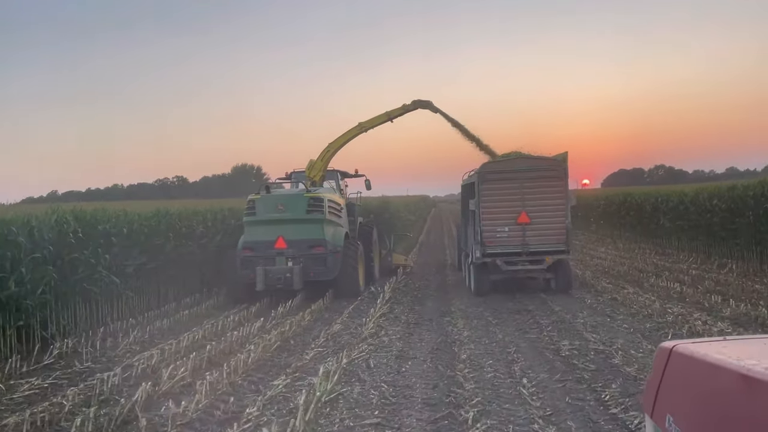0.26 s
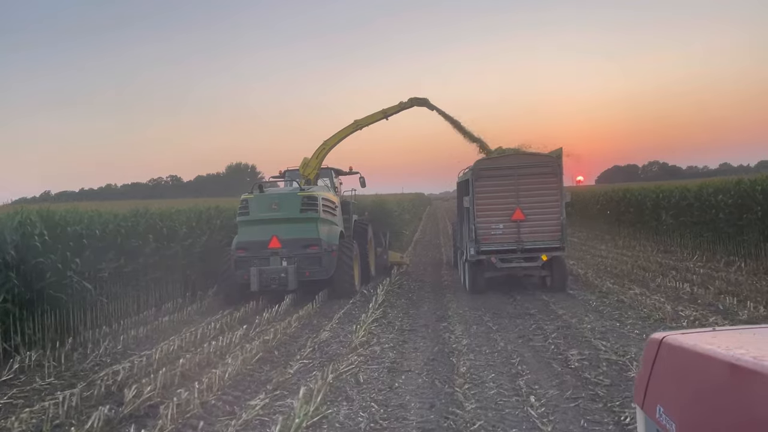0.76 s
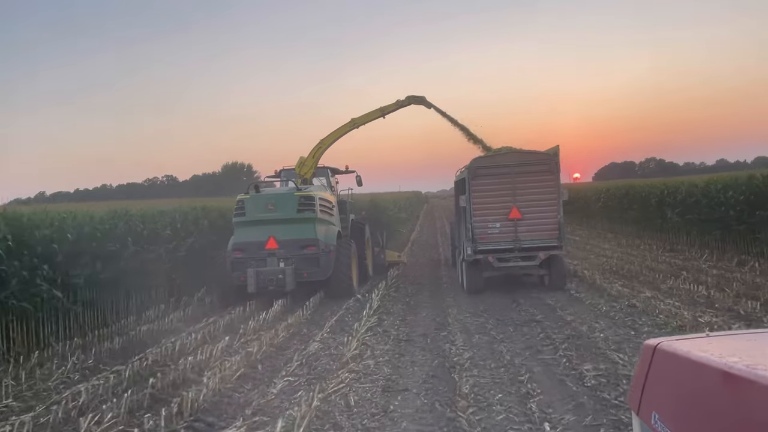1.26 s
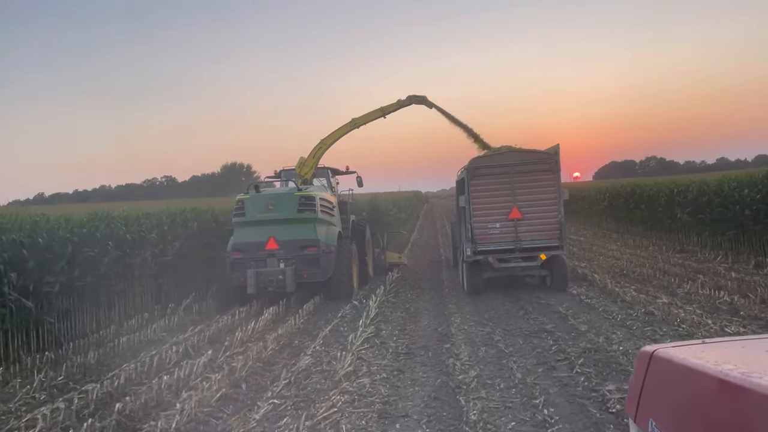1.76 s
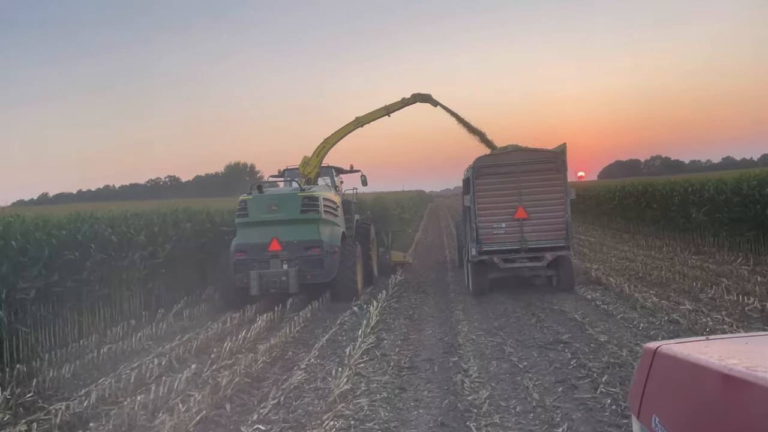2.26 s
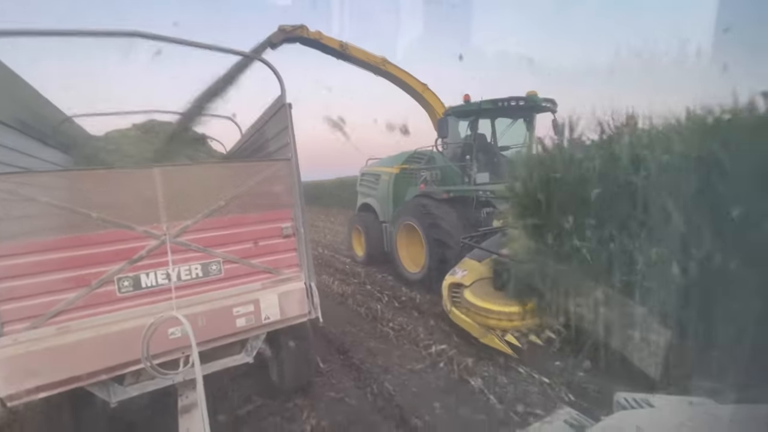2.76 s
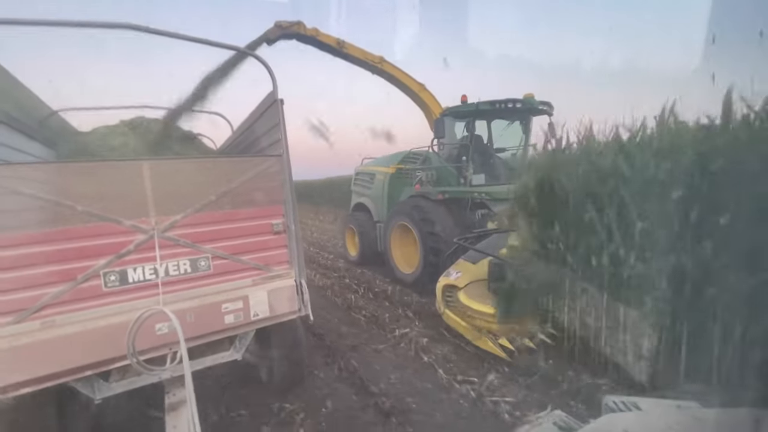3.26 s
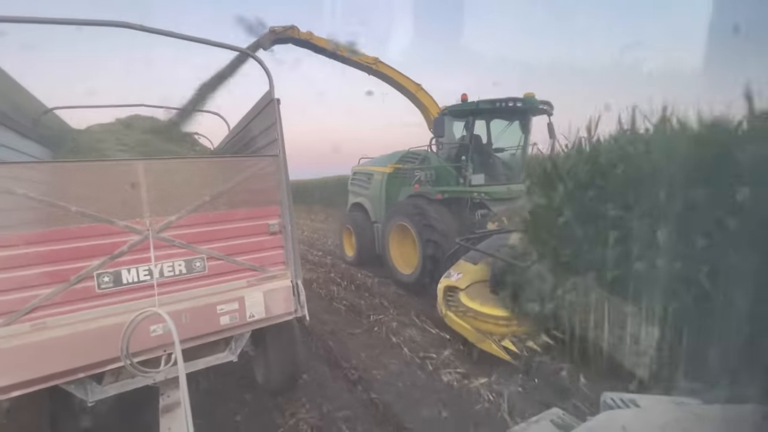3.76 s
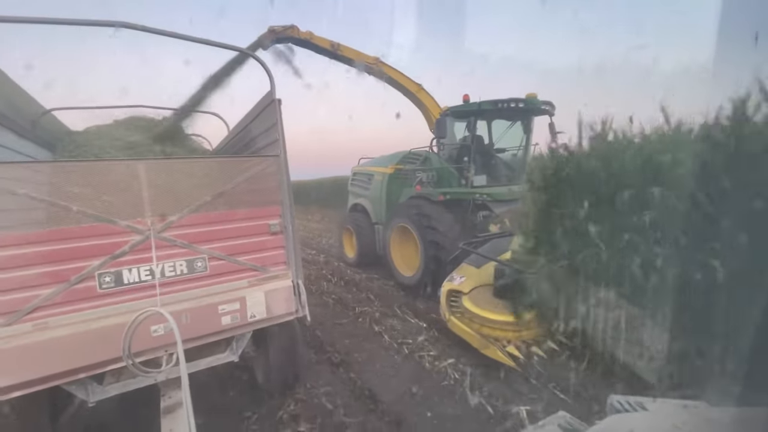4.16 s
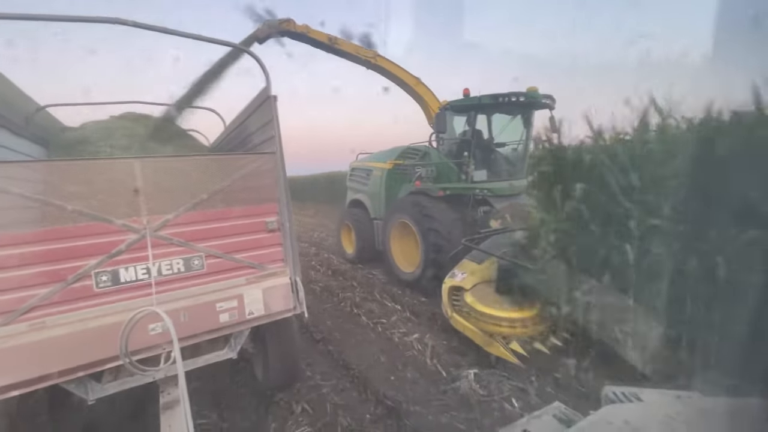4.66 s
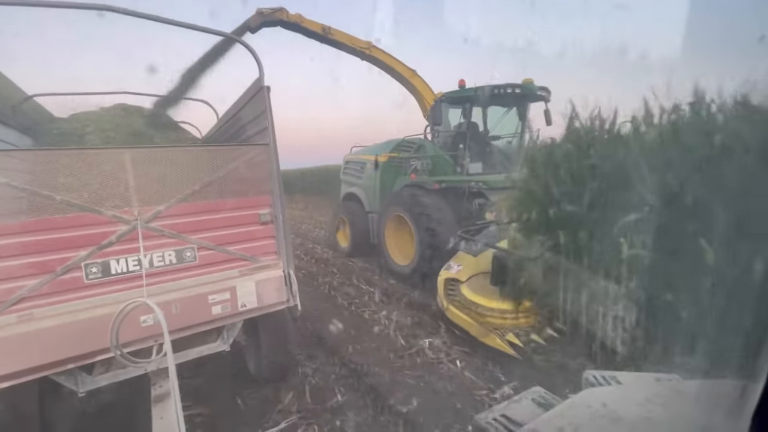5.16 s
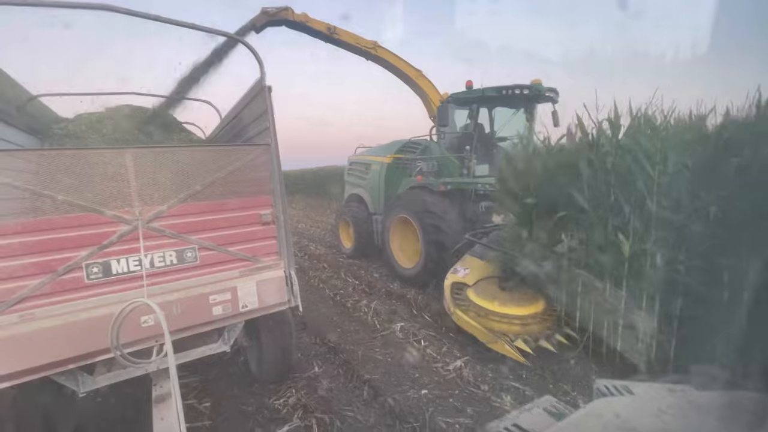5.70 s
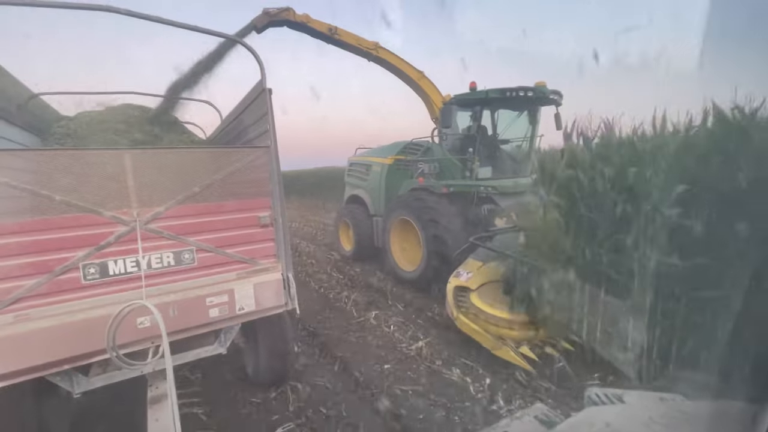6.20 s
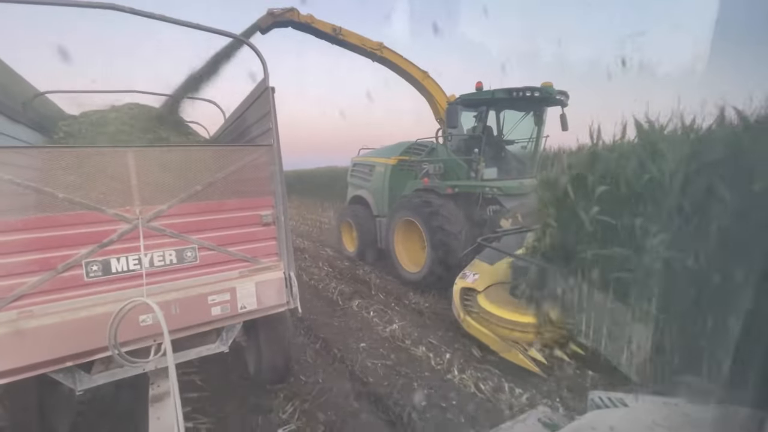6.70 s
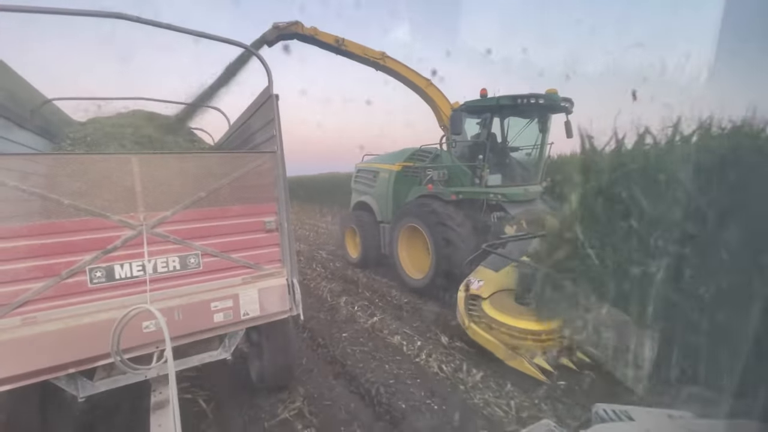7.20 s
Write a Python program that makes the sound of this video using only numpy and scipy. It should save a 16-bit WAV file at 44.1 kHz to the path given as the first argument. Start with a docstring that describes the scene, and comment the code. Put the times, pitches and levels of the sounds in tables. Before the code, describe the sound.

In an open field a forage harvester's six-cylinder diesel drones loudly and steadily, with knocking, broad machine roar, crop hiss, thin whistles and brief faint squeals. An abrupt cut moves the microphone inside a tractor cab: lower engine boom and rumble, wavering gear hum, a singing cutter drum, and chopped maize spraying in uneven surges through a ringing spout. Midway through the cab part, a fitting gives a tiny triple squeak.

```python
"""A forage harvester chops maize and blows it into a trailer pulled by a tractor.
First the open field: a six-cylinder diesel drones in engine orders over a repeating knock pattern,
with shaped-noise roar and hiss, thin sine whistles and a few arching squeals.
At 2.4 s we are in the tractor's cab: engine orders boom over rumble, gears hum, the cutter drum sings,
shaped noise surges as crop and rings the spout; near 4.5 s a fitting squeaks in three quick slips."""
import sys
import numpy as np
from scipy import signal
from scipy.fft import rfft, irfft, next_fast_len
from scipy.io import wavfile

SR = 44100
rng = np.random.default_rng(int(sys.argv[2]) if len(sys.argv) > 2 else 0)


def put_to_file(sound):
    """Save the sound as 16-bit audio at rate SR, in the file named by the first command-line argument."""
    columns = np.atleast_2d(sound).T  # one column per channel
    safe = np.clip(columns, -1, 1)
    whole_steps = np.round(safe * 32767)
    wavfile.write(sys.argv[1], SR, whole_steps.astype(np.int16))


N = 328104

# "Before trim" levels are starting levels; gains in the functions raise or lower them.
# Harvester speed, wandering slightly up and down: start_s, speed_rpm
HARVESTER_SPEED = [(0.0, 1948), (0.37, 1939), (0.61, 1949), (0.92, 1938), (1.22, 1948), (1.71, 1944),
                   (1.96, 1949), (2.37, 1938)]
# Strong orders of the harvester's diesel: cycle_multiple, level_db (rms, before trim), left_right_db,
# left_right_phase_rad
HARVESTER_ORDERS = [(6, -9.9, 0.9, 0.2), (7, -35.2, -0.6, 0.2), (8, -35.2, 1.1, 0.1), (9, -33.0, -0.9, 0.2),
                    (10, -31.4, 0.3, 0.1), (12, -26.3, 2.4, 0.4), (13, -38.7, 0.8, 0.1),
                    (16, -36.2, 1.8, 0.2), (22, -33, -0.6, 0.6), (24, -39.9, -6.2, 1.5),
                    (27, -35.2, -1.3, 0.2), (28, -33.4, 0.2, 0.5), (29, -39.0, -1.7, 0.7),
                    (30, -35.5, -5.0, 0.6), (31, -38.5, -2.9, 0.5), (35, -38.1, 0.6, 0.3),
                    (42, -38.2, -4.6, 0.5), (44, -33.8, -3.1, 0.4), (51, -34.0, -9.9, 1.0),
                    (57, -39.8, -5.0, 1.5), (58, -36.1, 4.7, 0.6), (60, -38.7, -3.9, 0.6),
                    (61, -41.3, -6.0, 0.8), (63, -32.9, -2.7, 0.8), (66, -41.9, -3.7, 1.1),
                    (68, -40.8, -7.6, 1.4), (75, -33.7, -4.5, 0.7), (76, -38.8, 1.9, 0.6),
                    (77, -41, -2, 0.6), (81, -41.6, -3.1, 0.7), (98, -38.9, -2.7, 0.6), (104, -43, -2, 0.6)]
# Knock pattern of the cylinders: pitch_hz, level_db (rms of each line, before trim)
KNOCK_SPECTRUM = [(50, -46), (65, -38), (115, -39), (220, -43), (420, -39.5), (620, -43), (950, -42),
                  (1400, -48), (2200, -53), (3500, -62)]
# Roar of the machines in the open: pitch_hz, mid_db, side_db (per Hz, before trim)
ROAR_SPECTRUM = [(20, -94, -82), (40, -56, -79), (76.6, -45, -68), (151, -51, -82), (206, -65.5, -85),
                 (242, -45, -75), (288, -56, -71), (355, -51, -62), (674, -58, -59.5), (980, -54.5, -66),
                 (1150, -59, -57), (1580, -57, -67)]
# Hiss of the blown crop in the open: pitch_hz, mid_db, side_db (per Hz)
HISS_SPECTRUM = [(1640, -63.5, -62.5), (2100, -63, -67), (3060, -67.5, -67.5), (3800, -68, -72),
                 (4580, -68, -74), (5660, -77.5, -72), (6420, -73.5, -81), (7390, -78, -74),
                 (8620, -133, -74.5), (9640, -83, -76), (11600, -78.5, -79), (13400, -81.5, -125),
                 (15200, -96, -108)]
# Turbo and hydraulic whistles: pitch_hz (at the start), rise_hz_per_s, level_db (rms at the start),
# swell_db_per_s, left_right_phase_rad
WHISTLE_TONES = [(2718, 6, -45.3, 2.8, 1.6), (7700, 30, -49.5, 0, 3.0)]
# Squeals of something rubbing: start_s, length_s, top_hz, top_db (rms)
SQUEAL_EVENTS = [(.22, .11, 2143, -33.3), (.36, .27, 2164, -33.3), (.65, .11, 2164, -36.5),
                 (1.88, .54, 2262, -36.8)]
SQUEAL_ARCH_HZ = 16

# The field drops away as the cab comes in
CUT_S, FIELD_FADE_S, CAB_FADE_S = 2.4, 0.0049, 0.028

# Engine speed heard from the cab, hunting slowly about the governor's setting
TRACTOR_RPM, HUNT_RPM, HUNT_PERIOD_S, HUNT_TOP_S = 1602.7, 2.86, .94, 3.11
# Tractor engine: cycle_multiple, level_db (rms, before trim), left_right_db, left_right_phase_rad
ENGINE_ORDERS = [(3, -32.0, 0.6, 0.1), (6, -19.4, 1.1, 0.1), (7, -35.2, -2.3, 0.3), (8, -39.6, -4.9, 0.5),
                 (9, -27.8, -3.6, 0.5), (10, -40.5, -1.8, 0.6), (12, -18.0, -5.0, 0.5),
                 (13, -39.5, -2.2, 0.7), (14, -34, -1.1, 0.1), (18, -38, -0.2, 0.2), (26, -51.2, -0.1, 0.2),
                 (27, -48.8, -3.0, 0.8), (28, -51, 0, 0.8), (30, -50.4, 3.3, 0.6), (32, -49.7, 4.8, 0.5),
                 (33, -50, 4.0, 1.4), (57, -50, 0, 1.2), (68, -44.5, 0, 1.7), (70, -48, 0, 1.5),
                 (71, -49, 0, 1.5), (75, -48, 0, 1.5)]
# Gears: hum_multiple, level_db (rms, before trim), left_right_db, left_right_phase_rad
GEAR_TONES = [(.505, -36.5, -2, 0.4), (.817, -36.2, 0, 0.2), (1, -29.2, 1, 1.2), (1.5, -45, 2, 1.0),
              (2, -41.5, 3, 1.3), (3, -49, 2, 1.3), (3.93, -53, 0, 1.3)]
# Wandering of the gear hum: start_s, pitch_hz, gain_db
GEAR_WANDER = [(2.43, 289.8, 0), (2.78, 297, 2), (4.45, 293, 4), (4.58, 289.5, 3), (5.78, 299.5, -1),
               (5.93, 296.1, 2), (6.77, 296.6, 1), (7.12, 301.3, 0), (7.44, 300.3, -6.5)]
# Low rumble of the cab: pitch_hz, mid_db, side_db (per Hz, before trim)
RUMBLE_SPECTRUM = [(18, -68, -78), (35, -51, -69), (62, -52, -71), (85, -49.5, -71), (100, -44, -67),
                   (142, -48.5, -75), (214, -55.5, -69), (240, -50.5, -63), (304, -49.5, -55),
                   (346, -61, -66), (417, -61, -70), (455, -56, -62), (473, -64, -62), (523, -64.5, -61),
                   (544, -58, -60.5), (615, -64, -60), (890, -65, -62), (976, -62, -57),
                   (1040, -68.5, -65.5)]
# Cutter drum: knife_rate_multiple, level_db (rms, before trim), left_right_db, left_right_phase_rad
KNIFE_ORDERS = [(2, -38.8, 5.9, 1.5), (3, -31.5, 10.0, 1.9), (4, -46.8, 4.9, 1.9), (5, -53, -0.6, 1.4),
                (6, -54.5, 4.8, 0.7), (8, -59.4, 4.5, 0.7)]
KNIVES_PER_CYCLE = 21.137   # knife passes per four-stroke cycle
# Load on the drum, easing now and then: start_s, note_db (before trim)
CUTTER_LOAD = [(2.4, 0.5), (3.1, 3.5), (3.25, -3), (3.65, 4), (4.03, -2), (4.4, 3), (4.9, 0), (5.35, 0),
               (5.8, 1.5), (6.8, 3.5), (7.3, 2.5), (7.44, -5)]

# Crop noise through the cab's glass: pitch_hz, mid_db, side_db (per Hz, before levelling)
CROP_SPECTRUM = [(1270, -72, -71), (1344, -63, -60.5), (1740, -67.5, -62.5), (2165, -68, -71.5),
                 (2780, -79, -80), (3000, -76, -73), (3300, -80.5, -79), (4550, -69, -68.5),
                 (5520, -85.5, -74), (6260, -70.5, -75), (7050, -83.5, -88), (10300, -102, -89.5),
                 (10770, -90, -83.5), (13600, -80, -103), (15500, -112, -118)]
# Crop flow, thinning now and then: start_s, chopping_db, spray_db (before trim)
CROP_FLOW = [(2.4, -37, -41), (2.62, -42, -49.5), (2.82, -41, -51), (3.2, -39.5, -43), (3.6, -40.5, -47.5),
             (4.1, -39.5, -45.5), (4.65, -36.5, -42.4), (4.84, -39, -49.5), (5.2, -37.5, -44.5),
             (5.8, -36, -44), (6.45, -35.5, -42), (6.66, -38.5, -46.5), (6.9, -37, -42.5), (7.44, -36, -44)]
# Stalks rustling into the header: start_s, above_spray_db (before trim)
RUSTLE_LEVEL = [(2.4, 4.5), (3.2, 3), (4.3, 1), (5.6, -1.5), (7.44, -4)]
# Wads of crop thrown from the spout: start_s, length_s, swell_db
CROP_WADS = [(2.448, 0.09, 2.7), (2.646, 0.13, 6.5), (2.795, 0.1, 6.7), (2.867, 0.1, 5.0),
             (2.964, 0.11, 3.4), (3.281, 0.19, 3.3), (3.452, 0.08, 3.9), (3.55, 0.2, 4.3),
             (3.751, 0.08, 3.8), (3.889, 0.14, 2.6), (4.006, 0.15, 4.1), (4.414, 0.21, 2.4),
             (4.671, 0.19, 4.9), (4.854, 0.12, 7.2), (4.954, 0.13, 7.0), (5.071, 0.12, 3.9),
             (5.238, 0.2, 5.3), (5.437, 0.12, 3.5), (5.577, 0.06, 2.8), (5.662, 0.07, 3.7),
             (5.705, 0.17, 4.1), (5.841, 0.07, 4.6), (5.979, 0.18, 3.0), (6.122, 0.1, 3.2),
             (6.203, 0.18, 2.3), (6.414, 0.2, 3.0), (6.672, 0.1, 4.3), (6.796, 0.09, 3.9),
             (7.068, 0.23, 2.8), (7.276, 0.12, 3.8)]
# Resonances of the spout: pitch_hz, t60_s (first of two rings), level_db (before trim),
# chopping_share (of its swing and the flares), rustle_share (of its swing)
SPOUT_RESONANCES = [(1535, 0.049, -2.1, 1.0, .05), (2935, 0.1, -14, 0.05, .9), (3114, 0.037, -14, 0.05, 1),
                    (3226, 0.065, -16, 0.05, .9)]
# Moments when the spout's lowest strand sings out: start_s, length_s, swell_db (before each strand's share)
SPOUT_FLARES = [(3.08, .16, 4), (3.36, .11, 5), (4.54, .16, 2), (4.99, .12, 3), (5.44, .13, 4),
                (6.11, .1, 5), (6.21, .09, 4.5), (6.42, .12, 3), (6.72, .14, 2), (7.05, .14, 4.5),
                (7.21, .12, 5)]

# Three quick slips of a cab fitting: start_s, length_s, tone_db (rms at the top)
SQUEAK_SLIPS = [(4.483, .0055, -21), (4.4888, .005, -21.5), (4.4945, .012, -25)]
SQUEAK_HZ, SQUEAK_RISE_HZ_PER_S, OVERTONE_T60_S = 1830, 300, .05
# Ringing overtones above the squeak's tone: pitch_hz, level_db (relative to its tone)
SQUEAK_OVERTONES = [(3784, -12.5), (5830, -15), (6713, -19)]
# Its dry scrape: pitch_hz, mid_db, side_db (per Hz, relative)
SCRAPE_SPECTRUM = [(2500, -10, -13), (4500, -7, -9), (5400, 0, -4), (6800, -6, -7), (8000, -14, -12),
                   (13500, -11, -19)]
SCRAPE_DB, SCRAPE_FADE_DB_PER_S = -11.5, 150   # relative to its tone

CUTOFF_HZ, EDGE_FADE_S = 15700, .004


def from_db(db):
    """Decibels to gain."""
    return 10 ** (np.asarray(db) / 20)


def since(start_s):
    """Seconds since this moment, at every sample."""
    return np.arange(N) / SR - start_s


def ramp(start_s, length_s):
    """Rises from 0 to 1 over this stretch."""
    return np.clip(since(start_s) / length_s, 0, 1)


def swells(rows):
    """Decibels added by smooth humps, one for each row."""
    return sum(swell_db * np.sin(np.pi * ramp(start_s, length_s)) ** 2 for start_s, length_s, swell_db in rows)


def in_time(rows):
    """Each column of a curve at every sample."""
    knots_s, *columns = np.transpose(rows)
    return [np.interp(np.arange(N) / SR, knots_s, column) for column in columns]


def at_hz(points, hz):
    """Each column of a spectrum at these frequencies, joined along a log frequency axis."""
    knots_hz, *columns = np.transpose(points)
    return [np.interp(np.log(hz + 1e-9), np.log(knots_hz), column) for column in columns]


def drift(rate_hz):
    """Slow random wander of spread 1: low-passed noise drawn at every 40th sample."""
    pole = np.exp(-80 * np.pi * rate_hz / SR)
    noise = rng.standard_normal(N // 40 + 2002)
    slow = signal.lfilter([1], [1, -2 * pole, pole * pole], noise)[2000:]   # drop the filter's settling
    return np.interp(np.arange(N) / 40, np.arange(len(slow)), slow / slow.std())


def turns(per_s):
    """Angle in radians of something turning at this rate."""
    return 2 * np.pi * np.cumsum(per_s) / SR


def cycle_rate(rpm):
    """Four-stroke cycles per second: one for every two turns of the crank."""
    return rpm / 120


def white():
    """Unrelated noise for mid and side."""
    return rng.standard_normal((2, N))


def coloured(excitation, spectrum, low_hz, high_hz):
    """Gives mid and side excitation a spectrum between two steep edges; returns left and right."""
    size = next_fast_len(N)
    hz = np.arange(size // 2 + 1) * SR / size + 1e-3
    edges = 1 / np.sqrt((1 + (low_hz / hz) ** 16) * (1 + (hz / high_hz) ** 16))
    shaped = rfft(excitation, size) * from_db(at_hz(spectrum, hz)) * edges
    mid, side = irfft(shaped, size)[:, :N] * np.sqrt(SR / 2)   # levels are per Hz
    return np.array([mid + side, mid - side])


def rms_one(stereo):
    """Scales a stereo sound so that its middle has rms 1."""
    return stereo / stereo.mean(axis=0).std()


def tone(angle, spread_rad, locked=False):
    """A stereo sine of rms 1, left leading by a phase; unless locked it starts anywhere."""
    start = rng.uniform(0, 2 * np.pi) * (not locked)
    angle = (angle % (2 * np.pi) + start).astype(np.float32)
    half = np.float32(spread_rad / 2)
    return np.sqrt(2) * np.array([np.sin(angle + half), np.sin(angle - half)])


def orders(angle, table, waver_db, waver_hz, count=6):
    """Tones locked to a shaft, the weaker wavering more; multiples of count rise together as one pulse."""
    out = np.zeros((2, N))
    strongest_db = max(row[1] for row in table)
    for multiple, level_db, pan_db, spread_rad in table:
        unsteady = np.clip((strongest_db - level_db) / 20, .2, 1)
        gain = from_db(level_db + waver_db * unsteady * drift(waver_hz))
        sides = from_db([[pan_db / 2], [-pan_db / 2]])
        balance = sides / np.sqrt(np.mean(sides ** 2))
        out += gain * balance * tone(multiple * angle, spread_rad, locked=multiple % count == 0)
    return out


def ring(excitation, hz, t60_s):
    """A mode: a unit click sets a sine of about height 1 ringing, down 60 dB after t60."""
    pole = from_db(-60 / (t60_s * SR))
    step = 2 * np.pi * hz / SR
    feedback = [1, -2 * pole * np.cos(step), pole * pole]
    return signal.lfilter([0, np.sin(step)], feedback, excitation + 1e-18)


def field_diesel(cycle, drone_db=0.17, knock_db=-2.0, rattle_db=-8, rattle_hz=7):
    """Exhaust drone at the firing rate, with block clatter and a looser rattle that comes and goes."""
    clatter = from_db(knock_db) * knock(cycle)
    rattle = from_db(rattle_db) * drift(rattle_hz) * knock(cycle)
    return from_db(drone_db) * orders(cycle, HARVESTER_ORDERS, waver_db=2.5, waver_hz=11.4) + clatter + rattle


def knock(cycle, size=8192, count=215):
    """Cylinders knock unalike, so one uneven pattern repeats each cycle and fills in the weak orders."""
    multiple = np.arange(3, count)
    hz = multiple * cycle_rate(np.mean(np.array(HARVESTER_SPEED)[:, 1]))
    weak = ~np.isin(multiple, np.array(HARVESTER_ORDERS)[:, 0])
    any_phase = np.exp(2j * np.pi * rng.random(len(hz)))
    lines = weak * from_db(at_hz(KNOCK_SPECTRUM, hz)[0]) * any_phase
    # the sides differ more towards the treble
    spread_rad = np.minimum(hz / 1500, 1) * rng.normal(0, 1.0, (2, len(hz)))
    spectrum = np.pad(lines * np.exp(1j * spread_rad), ((0, 0), (3, 0)))
    pattern = irfft(spectrum, size) * size / np.sqrt(2)
    place = cycle / (2 * np.pi) * size
    return np.array([np.interp(place, np.arange(size), side, period=size) for side in pattern])


def field_roar(cycle, cycle_depth=0.027, crank_depth=0.049, firing_depth=0.078,
               churn_depth=0.14, churn_db=2.0, roughness_db=1.0, roar_db=-2.0):
    """Chopper and blower noise throbs with engine cycle, crank and firing; its body churns hardest."""
    throb = (1 + cycle_depth * np.cos(cycle) + crank_depth * np.cos(2 * cycle)
             + firing_depth * np.cos(6 * cycle))
    churn = (1 + churn_depth * np.cos(cycle)) * from_db(roar_db + churn_db * drift(23))
    roughness = from_db(roughness_db * drift(70))   # fast random roughness of the roar
    roar = coloured(white() * throb * churn * roughness, ROAR_SPECTRUM, 15, 1710)
    flutter = from_db(.4 * drift(12))
    return roar + flutter * coloured(white() * throb, HISS_SPECTRUM, 1670, 16000)


def whistles():
    """Thin turbo and hydraulic whistles waver in level and pitch above the roar, creeping upwards."""
    out = np.zeros((2, N))
    for start_hz, rise_hz_per_s, level_db, swell_db_per_s, spread_rad in WHISTLE_TONES:
        gain = from_db(level_db + swell_db_per_s * since(0) + 2 * drift(5))
        hz = (start_hz + rise_hz_per_s * since(0)) * (1 + .001 * drift(12))
        out += gain * tone(turns(hz), spread_rad)
    return out


def squeals():
    """Something rubs now and then: the level comes up and holds while the pitch arches up and down."""
    out = np.zeros((2, N))
    for start_s, length_s, top_hz, top_db in SQUEAL_EVENTS:
        arch = np.sin(np.pi * ramp(start_s, length_s))
        hz = top_hz - SQUEAL_ARCH_HZ * (1 - arch)
        envelope = np.minimum(np.abs(arch) * 2, 1)
        out += from_db(top_db) * envelope * tone(turns(hz), .6)
    return out


def tractor(cycle, gear_hz, gear_db, firing_depth=0.25, cycle_depth=0.17):
    """Engine orders boom over a rumble pulsing with each uneven firing, and a wavering gear hum."""
    # the minus sign: the panels invert each pulse
    engine = -from_db(-0.26) * orders(cycle, ENGINE_ORDERS, waver_db=1.0, waver_hz=3.6)
    gear_angle = turns(gear_hz * (1 + 0.006 * drift(10)))
    gear_gain = from_db(gear_db + 1.1 * drift(20.0))
    gears = gear_gain * orders(gear_angle, GEAR_TONES, waver_db=2.5, waver_hz=12.0)
    throb = (1 + firing_depth * np.cos(6 * cycle)) * (1 + cycle_depth * np.cos(cycle))
    rumble = from_db(0.93 + .5 * drift(26)) * coloured(white() * throb, RUMBLE_SPECTRUM, 15, 1190)
    return engine + gears + rumble


def cutter(knives_per_s, note_db=-2.13):
    """The knives sing as they pass the shear bar, louder under load."""
    angle = turns(knives_per_s * (1 + .0018 * drift(8)))
    load_db = in_time(CUTTER_LOAD)[0]
    gain = from_db(note_db + load_db + 1.0 * drift(17.0))
    return gain * orders(angle, KNIFE_ORDERS, waver_db=4.0, waver_hz=5.8)


def crop(chaff_share=0.76, chaff_wad_share=1.0, chop_wad_share=0.31, chop_lump_db=1.3, spray_lump_db=1.45):
    """Stalks rustle in, are chopped in lumps that ring the spout, and spray into the trailer wad by wad."""
    chop_db, flow_db = in_time(CROP_FLOW)
    wads_db = swells(CROP_WADS)
    lumps = drift(29)
    chop_db = chop_db + chop_wad_share * wads_db
    spray_db = flow_db + wads_db

    rustle_db = spray_db + in_time(RUSTLE_LEVEL)[0]
    rustle_gain = from_db(rustle_db - 5.0 + 2.3 * drift(45))
    rustle = rms_one(coloured(white(), CROP_SPECTRUM, 2970, 3200)) * rustle_gain

    chop_gain = from_db(chop_db - 0.87 + chop_lump_db * lumps)
    chop = rms_one(coloured(white(), CROP_SPECTRUM, 980, 2980)) * chop_gain

    # about 900 chip clicks a second in mid and in side, on top of steady noise
    clicks = (rng.random((2, N)) < 900 / SR) * rng.standard_normal((2, N)) * 1.3
    spray_gain = from_db(spray_db - 2.5 + spray_lump_db * drift(40))
    spray = rms_one(coloured(white() + clicks, CROP_SPECTRUM, 3800, 9000)) * spray_gain

    # fine chaff hangs in the air, so its hiss follows the steady flow only in part
    chaff_db = chaff_share * (flow_db - flow_db.mean()) + chaff_wad_share * (wads_db - wads_db.mean())
    chaff = coloured(white(), CROP_SPECTRUM, 7030, 11250) * from_db(chaff_db + spray_lump_db * lumps)
    return rustle + chop + spout(chop_db, rustle_db) + spray + chaff


def spout(chop_db, rustle_db, level_db=-4.5, flare_db=3.0, flare_hz=22, wander=.004):
    """The crop stream sets the spout singing in narrow strands that flutter and wander in pitch."""
    out = np.zeros((2, N))
    chop_swing_db = chop_db - chop_db.mean() + swells(SPOUT_FLARES)
    rustle_swing_db = rustle_db - np.median(rustle_db)
    for hz, t60_s, mode_db, chop_share, rustle_share in SPOUT_RESONANCES:
        hum = ring(ring(white(), hz, t60_s), hz, t60_s / 2)
        clock = np.arange(N) + np.cumsum(wander * drift(4.01))   # uneven playback bends the pitch
        hum = np.array([np.interp(clock, np.arange(N), side) for side in hum])
        load_db = chop_db.mean() + chop_share * chop_swing_db + rustle_share * rustle_swing_db
        out += rms_one(hum) * from_db(load_db + level_db + mode_db + flare_db * drift(flare_hz))
    return out


def squeak(rough=0.0152):
    """Stick and slip: each slip bursts with a clear tone, ringing overtones above it and a dry scrape."""
    envelope = sum(from_db(level_db) * np.sqrt(np.abs(np.sin(np.pi * ramp(start_s, length_s))))
                   for start_s, length_s, level_db in SQUEAK_SLIPS)
    age_s = np.clip(since(SQUEAK_SLIPS[0][0]), 0, .05)
    hz = (SQUEAK_HZ + SQUEAK_RISE_HZ_PER_S * age_s) * (1 + rough * drift(200))
    voice = tone(turns(hz), 1.0)
    modes = sum(from_db(level_db) * rms_one(ring(white(), mode_hz, OVERTONE_T60_S))
                for mode_hz, level_db in SQUEAK_OVERTONES)
    scrape_gain = from_db(SCRAPE_DB - SCRAPE_FADE_DB_PER_S * age_s)
    scrape = scrape_gain * rms_one(coloured(white(), SCRAPE_SPECTRUM, 2500, 13500))
    return envelope * (voice + modes + scrape)


def scene():
    """The open field, then the cab, whose cutter keeps a fixed ratio to the engine heard there."""
    harvester_rate = cycle_rate(in_time(HARVESTER_SPEED)[0])
    field_cycle = turns(harvester_rate * (1 + 0.0016 * drift(24)))
    field = field_diesel(field_cycle) + field_roar(field_cycle) + whistles() + squeals()

    hunt = np.cos(2 * np.pi * since(HUNT_TOP_S) / HUNT_PERIOD_S)
    cycles_per_s = cycle_rate(TRACTOR_RPM + HUNT_RPM * hunt)
    gear_hz, gear_db = in_time(GEAR_WANDER)
    cab = tractor(turns(cycles_per_s), gear_hz, gear_db)
    cab = cab + cutter(KNIVES_PER_CYCLE * cycles_per_s) + crop() + squeak()

    field_gain = 1 - ramp(CUT_S - FIELD_FADE_S, FIELD_FADE_S)
    cab_gain = ramp(CUT_S - FIELD_FADE_S / 2, CAB_FADE_S)
    return field_gain * field + cab_gain * cab


def record(dry):
    """The highest peaks are rounded, the top is cut steeply, and both ends fade without a click."""
    rounded = dry / (1 + (dry / .99) ** 20) ** (1 / 20)
    treble_cut = signal.ellip(10, .1, 90, CUTOFF_HZ, fs=SR, output="sos")
    fade = ramp(0, EDGE_FADE_S) * ramp(0, EDGE_FADE_S)[::-1]
    return fade * signal.sosfilt(treble_cut, rounded)


dry = scene()
out = record(dry)
put_to_file(out)
```